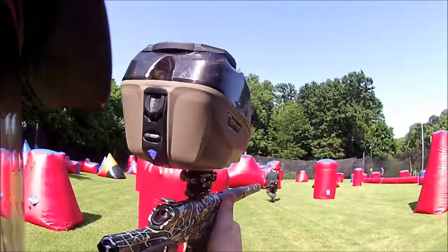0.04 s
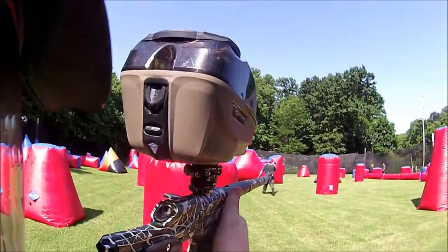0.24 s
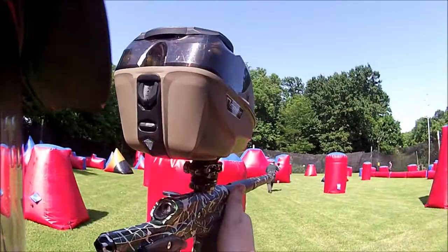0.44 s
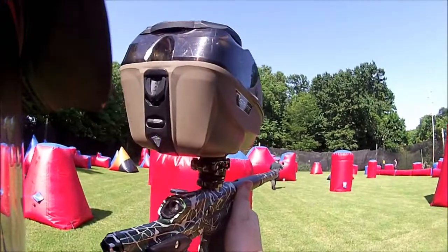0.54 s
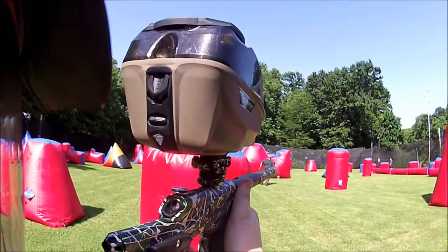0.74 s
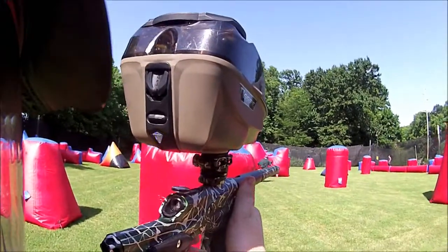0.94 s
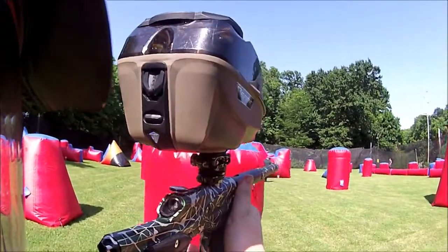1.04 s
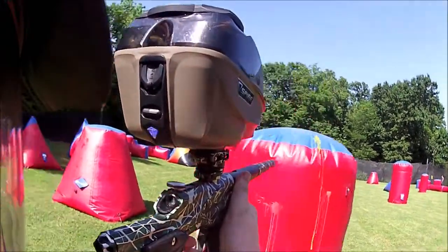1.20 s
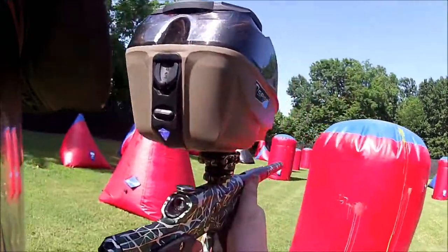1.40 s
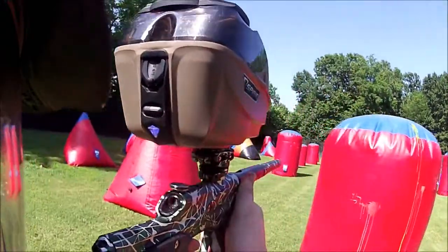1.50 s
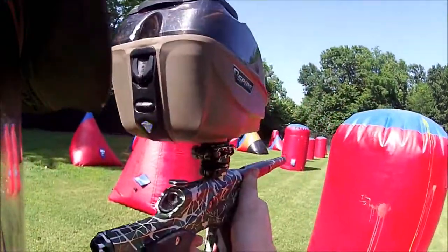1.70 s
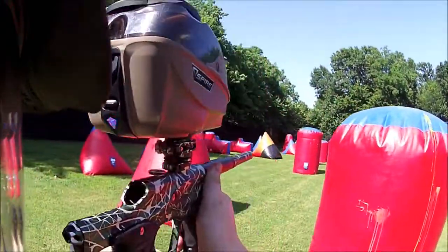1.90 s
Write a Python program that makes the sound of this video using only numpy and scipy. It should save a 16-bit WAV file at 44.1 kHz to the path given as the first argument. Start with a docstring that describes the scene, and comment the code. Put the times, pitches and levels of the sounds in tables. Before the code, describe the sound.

Rapid paintball fire bursts out very close, ten sharp pops that slightly overload the microphone. Afterwards come fainter shots across the outdoor field, paint slapping inflatable bunkers and a few soft bumps, with a light echo.

```python
"""Over a faint outdoor background, paintball markers pop across the field. Then one right beside the
microphone fires ten rapid shots and overloads it. Each is a light solenoid click, a bolt clack, a blast of
air 5 ms later and a low barrel thump; trigger clicks fall in between. After the last shot the other markers
keep firing, sharp snaps come from far off, balls whizz past and paint smacks into inflatable bunkers.
A few soft, low bumps come near the end. All along, the tree line echoes the shots and hits."""
import sys
import numpy as np
from scipy import signal
from scipy.fft import rfft, irfft
from scipy.io import wavfile
from scipy.ndimage import uniform_filter1d

SR = 44100
rng = np.random.default_rng(int(sys.argv[2]) if len(sys.argv) > 2 else 0)


def master_out(mix):
    """Clip the mix to full scale and print it as 16-bit PCM to the path in sys.argv[1]."""
    frames = np.transpose(np.atleast_2d(mix))
    ceiling = np.clip(frames, -1, 1)
    pcm = np.round(ceiling * 32767).astype(np.int16)
    wavfile.write(sys.argv[1], SR, pcm)


N = 85995
T = np.arange(8192) / SR  # time within one short sound, in seconds


def amp(db):
    """Turn decibels into a gain."""
    return 10 ** (np.asarray(db) / 20)


def along(points, hz):
    """Read values off a curve of (pitch_hz, value) points, on a log pitch axis."""
    pitches, values = np.transpose(points)
    return np.interp(np.log(hz + 1), np.log(pitches + 1), values)


def add(track, start_s, sound):
    """Mix a sound into the track."""
    i = max(0, round(start_s * SR))
    track[i:i + len(sound)] += sound[:max(0, len(track) - i)]


def fade(t, fade_s):
    """Die away, losing 60 dB every fade_s seconds."""
    return np.exp(-np.log(1000) * t / fade_s)


def noise(colour, size):
    """Steady noise of strength (rms) 1. Its colour says how strong each pitch is."""
    gain = amp(along(colour, np.fft.rfftfreq(size, 1 / SR)))
    x = irfft(rfft(rng.standard_normal(size)) * gain, size)
    return x / x.std()


def burst(colour, rise_s, hold_s, fade_s, peaks=()):
    """A short rush of noise that rings through a colour and its resonant peaks."""
    n, hz = len(T), np.fft.rfftfreq(len(T), 1 / SR)
    envelope = np.minimum(T / rise_s, 1) * fade(np.maximum(T - rise_s - hold_s, 0), fade_s)
    spectrum = rfft(envelope * rng.standard_normal(n))
    even = irfft(spectrum / (np.abs(spectrum) + 1e-12))  # every pitch equally strong
    drive = envelope * even / (uniform_filter1d(np.abs(even), size=48) + 1e-12)
    peaks_db = sum(lift / (1 + (2 * (hz - pitch) / width) ** 2) for pitch, width, lift in peaks)
    # a minimum-phase filter: it rings after the hit, never before
    cepstrum = irfft(np.log(amp(along(colour, hz) + peaks_db)))
    response = np.exp(rfft(2 * cepstrum * (np.arange(n) < n // 2)) - cepstrum[0])
    x = irfft(rfft(drive) * response)
    return x * np.linalg.norm(envelope) / np.linalg.norm(x)


def ring(tones, rise_s, scatter_db=.6, detune=.012):
    """A struck thing rings with fading tones, a little different at every blow."""
    x = np.zeros(len(T))
    for hz, db, fade_s in tones:
        gain = amp(db + scatter_db * rng.normal())
        pitch_hz = hz * (1 + detune * rng.normal())
        x += gain * fade(T, fade_s) * np.sin(2 * np.pi * pitch_hz * T)
    return x * (1 - np.exp(-T / rise_s))


# colour of the open field: pitch_hz, gain_db
FIELD_COLOUR = [(25, -5), (130, -3), (300, -7), (520, -3), (1000, -14), (1900, -9), (2700, -2), (3300, -16),
                (6000, -24), (9300, -24), (11000, -43), (15000, -54)]

def field(level_db=-46):
    """A faint, steady outdoor rush."""
    return amp(level_db) * noise(FIELD_COLOUR, N)


# colour of the echo: pitch_hz, gain_db
ECHO_COLOUR = [(50, -8), (170, -5), (350, -5), (600, -1), (950, 3), (1500, 4), (2200, -6), (2850, 0),
               (3400, -12), (4300, -11), (6000, -16), (9300, -10), (11000, -24), (15000, -37)]
# how long the echo lasts: pitch_hz, fade_s
ECHO_FADE = [(100, 1.0), (1000, 1.3), (2700, 1.6), (5000, 1.1), (12000, .9)]

def tree_echo(direct, gain_db=-12.5, rise_s=.09, stretches=20):
    """The tree line scatters sound back, each stretch of it along its own paths."""
    out = np.zeros(N)
    for part in np.array_split(np.arange(N), stretches):
        hz, t, spectra = signal.stft(rng.standard_normal(SR), SR, nperseg=256)
        envelope = fade(t, along(ECHO_FADE, hz)[:, None]) * (1 - np.exp(-t / rise_s))
        colour = amp(along(ECHO_COLOUR, hz))[:, None]
        _, tail = signal.istft(spectra * envelope * colour, SR, nperseg=256)
        add(out, part[0] / SR, signal.fftconvolve(direct[part], tail) / np.sqrt(SR / 10))
    return amp(gain_db) * out


# balls flying past: start_s, length_s, level_db, from_hz, to_hz
WHIZZES = [(1.21, .09, -57, 6700, 6100), (1.36, .07, -50, 4350, 3950), (1.39, .1, -54, 3900, 3500)]

def whizzes(width_hz=130):
    """A passing ball sheds a narrow, falling whistle."""
    out = np.zeros(N)
    for start_s, length_s, db, from_hz, to_hz in WHIZZES:
        n = int(length_s * SR)
        flutter = noise([(1, 0), (width_hz, 0), (3 * width_hz, -20), (2000, -100)], len(T))[:n]
        whistle = np.sin(2 * np.pi * np.cumsum(np.linspace(from_hz, to_hz, n)) / SR)
        add(out, start_s, 2 * amp(db) * np.hanning(n) * flutter * whistle)
    return out


# low bumps: start_s, level_db, pitch_hz
BUMPS = [(1.677, -21, 255), (1.676, -25, 115), (1.575, -31, 280), (1.925, -31, 75)]

def bumps(fade_s=.055):
    """Soft, low knocks without any crack."""
    out = np.zeros(N)
    for start_s, db, hz in BUMPS:
        add(out, start_s, amp(db) * ring([(hz, 0, fade_s)], rise_s=.0015))
    return out


# far-off snaps: start_s, level_db
SNAPS = [(1.2505, -28), (1.3305, -19), (1.4678, -27), (1.609, -24), (1.7445, -20), (1.8865, -22)]
# their colour: pitch_hz, gain_db
SNAP_COLOUR = [(100, -28), (1200, -23), (1900, -7), (2350, 0), (2800, -9), (3400, -29), (6000, -32),
               (9000, -42), (14000, -64)]

def snaps():
    """Very short, thin cracks from far down the field."""
    out = np.zeros(N)
    for start_s, db in SNAPS:
        add(out, start_s, amp(db) * burst(SNAP_COLOUR, rise_s=.0003, hold_s=.0007, fade_s=.005))
    return out


# shots of the other markers: start_s, level_db
OTHER_SHOTS = [(.0275, -25.5), (.1675, -25.5), (.398, -26), (1.0055, -25), (1.1008, -24), (1.2015, -27),
               (1.663, -26), (1.8197, -27), (1.9243, -27)]
# colours of a pop and of a hiss (air or paint spray): pitch_hz, gain_db
POP_COLOUR = [(50, -7), (130, -1), (250, -4), (550, -1), (1000, -7), (1600, -2), (2100, -3), (2750, 0),
              (3400, -15), (6000, -14), (9000, -18), (11000, -38), (15000, -50)]
HISS_COLOUR = [(100, -4), (600, -3), (1000, -6), (2600, 1), (3500, -10), (5700, -1), (7000, -8),
               (9000, -10), (11000, -29), (15000, -42)]
# where their bodies ring: pitch_hz, width_hz, lift_db
OTHER_BODY = [(1660, 170, 5), (2800, 200, 9)]

def other_markers():
    """Markers some metres off pop, air hisses out, and the bolt slides back."""
    out = np.zeros(N)
    for start_s, db in OTHER_SHOTS:
        pop = burst(POP_COLOUR, rise_s=.0004, hold_s=.002, fade_s=.028, peaks=OTHER_BODY)
        hiss = burst(HISS_COLOUR, rise_s=.0008, hold_s=.0015, fade_s=.016)
        bolt_return = burst(HISS_COLOUR, rise_s=.001, hold_s=.002, fade_s=.04)
        add(out, start_s, amp(db) * pop)
        add(out, start_s + .004, amp(db - 2.5) * hiss)
        add(out, start_s + .015, amp(db - 12) * bolt_return)
    return out


# a hit on the nearest bunker: start_s, level_db
SMACKS = [(1.3157, -8)]
# tones of its tight skin: pitch_hz, level_db, fade_s
SKIN_TONES = [(420, -20, .04), (815, -10, .028), (1020, -12, .024), (1410, -11, .026)]
# hits on bunkers further off: start_s, thud_db, slap_db
THUDS = [(.894, -26, -39), (1.367, -22, -42), (1.5178, -23, -26)]
# colours of a smack and a thud: pitch_hz, gain_db
SMACK_COLOUR = [(80, -22), (400, -9), (1000, -7), (1600, -8), (2500, 0), (3000, -5), (3600, -22),
                (6000, -26), (9000, -35), (14000, -54)]
THUD_COLOUR = [(40, -16), (120, -2), (210, 3), (450, -5), (1000, -7), (1400, -19), (3000, -32), (9000, -60),
               (14000, -85)]

def bunker_hits():
    """Paint hits blown-up vinyl: nearby a smack, a ringing skin and spray; further off a slap and thud."""
    out = np.zeros(N)
    for start_s, db in SMACKS:
        smack = burst(SMACK_COLOUR, rise_s=.0002, hold_s=.0012, fade_s=.028)
        add(out, start_s, amp(db) * smack)
        add(out, start_s + .0025, ring(SKIN_TONES, rise_s=.0004))
        spray = burst(HISS_COLOUR, rise_s=.001, hold_s=.002, fade_s=.016)
        add(out, start_s + .0175, amp(db - 20) * spray)
    for start_s, thud_db, slap_db in THUDS:
        thud = burst(THUD_COLOUR, rise_s=.0005, hold_s=.002, fade_s=.085)
        slap = burst(SMACK_COLOUR, rise_s=.0002, hold_s=.001, fade_s=.014)
        add(out, start_s, amp(thud_db) * thud + amp(slap_db) * slap)
    return out


# trigger clicks: start_s, level_db
CLICKS = [(.2198, -27), (.329, -29), (.4417, -25.5), (.532, -25), (.8308, -25)]
# their colour: pitch_hz, gain_db
CLICK_COLOUR = [(100, -15), (1000, -11), (2000, -7), (2650, 1), (3400, -7), (4200, -3), (6000, -10),
                (9000, -13), (11000, -27), (15000, -36)]

def trigger():
    """The close marker's trigger clicks lightly before some of the shots."""
    out = np.zeros(N)
    for start_s, db in CLICKS:
        add(out, start_s, amp(db) * burst(CLICK_COLOUR, rise_s=.0005, hold_s=.0006, fade_s=.026))
    return out


# shots of the close marker: start_s, level_db
SHOTS = [(.2412, 0), (.3502, 0), (.4631, 0), (.5634, -1), (.6632, -1), (.7640, -1), (.8637, -1),
         (.9635, -1), (1.0638, .5), (1.1641, 0)]
# the steps of one shot: delay_s, level_db, rise_s, hold_s, fade_s
SOLENOID = (-.014, -30, .001, .003, .036)  # a magnetic switch clicks
CLACK = (-.0004, -4.5, .0008, .0015, .0085)  # the bolt, a sliding rod, strikes
BLAST = (.0049, -7.5, .0008, .0018, .01)  # air bursts out
RATTLE = (.0115, -25, .001, .003, .034)  # the bolt comes back
WASH = (.02, -42, .004, .006, .1)  # a short, bright wash follows
# their colours: pitch_hz, gain_db
CLACK_COLOUR = [(60, -26), (130, -11), (350, -9), (750, -10), (1100, -14), (1700, -10), (2350, 0),
                (2900, -7), (3600, -6), (5000, -16), (9000, -16), (11000, -31), (15000, -38)]
BLAST_COLOUR = [(60, -24), (300, -8), (750, -9), (1100, -14), (1700, -11), (2100, 0), (2500, -5),
                (3600, -4), (5000, -9), (9000, -9), (11000, -21), (15000, -24)]
RATTLE_COLOUR = [(60, -14), (200, -8), (520, 0), (1100, -3), (2100, -6), (2700, -2), (3300, -9), (4300, -6),
                 (6000, -12), (9300, -11), (11000, -28), (15000, -38)]
WASH_COLOUR = [(100, -12), (700, 0), (2500, -3), (4300, 0), (6000, -6), (9300, -2), (11000, -17),
               (15000, -25)]
# where the marker's body rings: pitch_hz, width_hz, lift_db
BODY = [(2080, 130, 5), (2440, 120, 3), (2630, 120, 5), (2880, 120, 2), (3180, 200, -6), (3520, 180, 7),
        (4030, 200, 2), (4420, 90, 4), (4780, 400, -7), (5280, 260, 9), (6400, 300, -3), (6960, 200, 3),
        (9100, 400, 2)]
# tones that together make the short low thump: pitch_hz, level_db, fade_s
THUMP_TONES = [(125, -16, .033), (275, -1.5, .018), (380, -.5, .016), (780, -16, .027)]

def close_marker(thump_delay_s=.0062):
    """Each step of a shot rings through the marker's body, and the air in the barrel thumps."""
    out = np.zeros(N)
    steps = [(SOLENOID, RATTLE_COLOUR), (CLACK, CLACK_COLOUR), (BLAST, BLAST_COLOUR),
             (RATTLE, RATTLE_COLOUR), (WASH, WASH_COLOUR)]
    for start_s, shot_db in SHOTS:
        for (delay_s, step_db, rise_s, hold_s, fade_s), colour in steps:
            step = burst(colour, rise_s, hold_s, fade_s, peaks=BODY)
            add(out, start_s + delay_s, amp(shot_db + step_db) * step)
        add(out, start_s + thump_delay_s, amp(shot_db) * ring(THUMP_TONES, rise_s=.003))
    return out


def scene():
    """All the shooting, its echo and the field's background, in one channel."""
    direct = close_marker() + trigger() + other_markers() + snaps() + bunker_hits() + bumps()
    return (direct + tree_echo(direct) + whizzes() + field())[None]


def record(dry, ceiling=.53, hardness=6, low_cut_hz=55, high_cut_hz=15700):
    """The microphone squashes the loudest peaks, thins the deep bass and loses the highest treble."""
    clipped = dry / (1 + np.abs(dry / ceiling) ** hardness) ** (1 / hardness)
    thinned = signal.sosfilt(signal.butter(1, low_cut_hz, "highpass", fs=SR, output="sos"), clipped)
    return signal.sosfiltfilt(signal.butter(14, high_cut_hz, fs=SR, output="sos"), thinned)


dry = scene()
out = record(dry)
master_out(out)
```